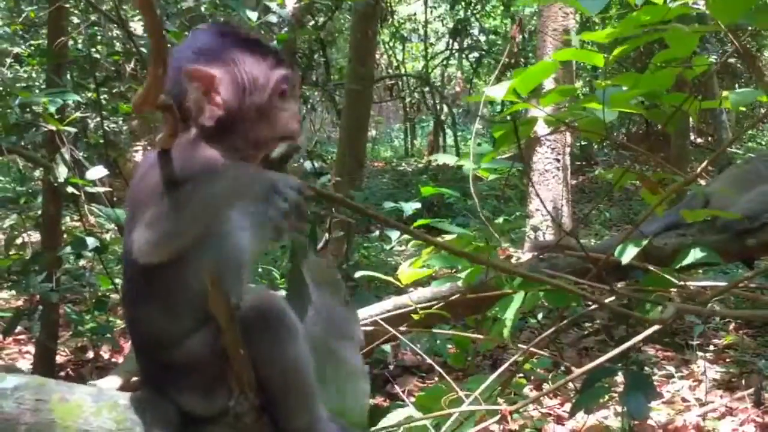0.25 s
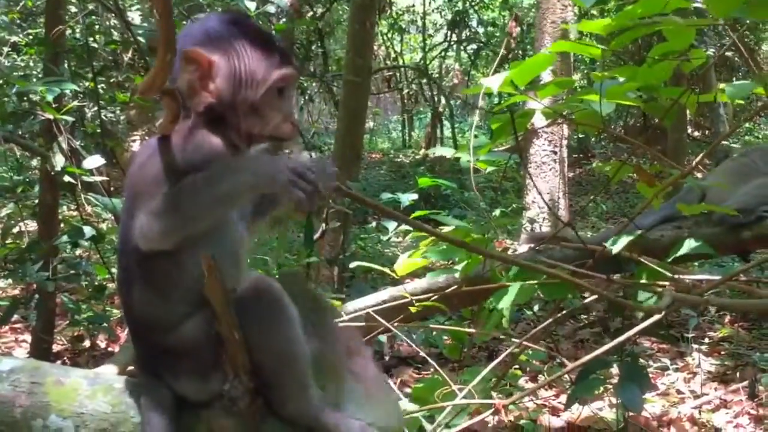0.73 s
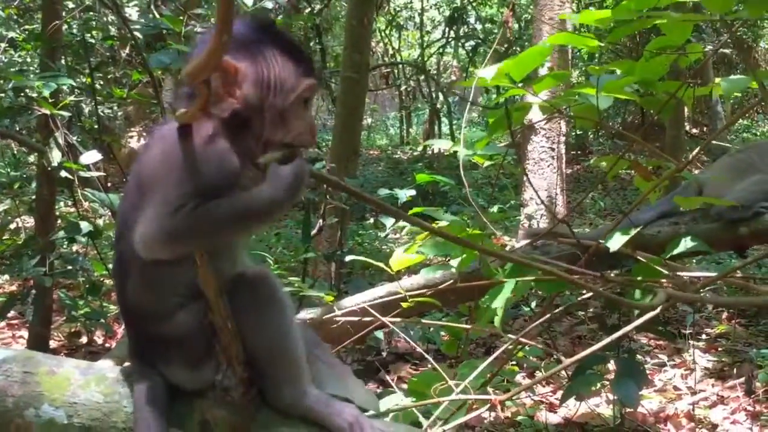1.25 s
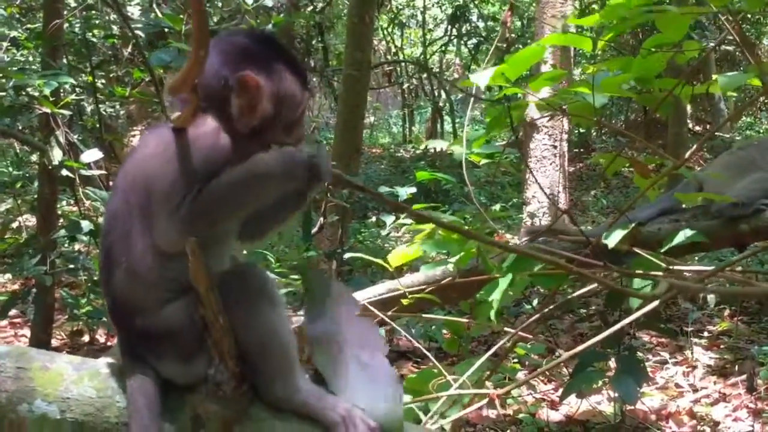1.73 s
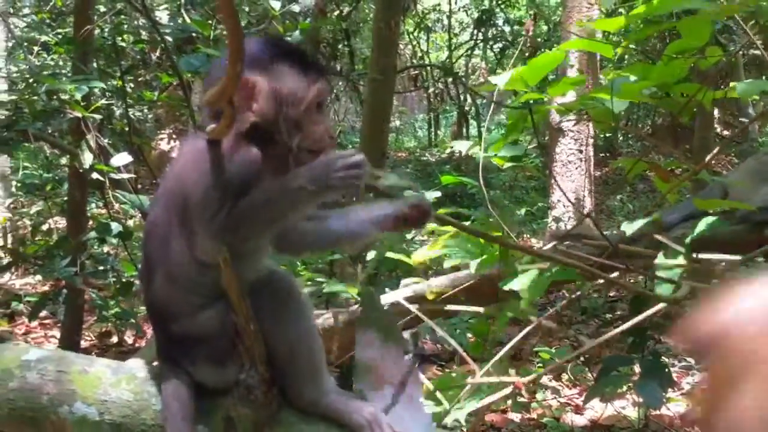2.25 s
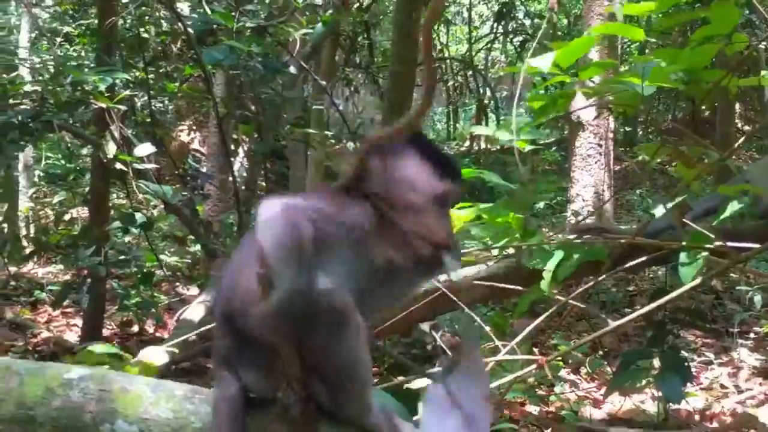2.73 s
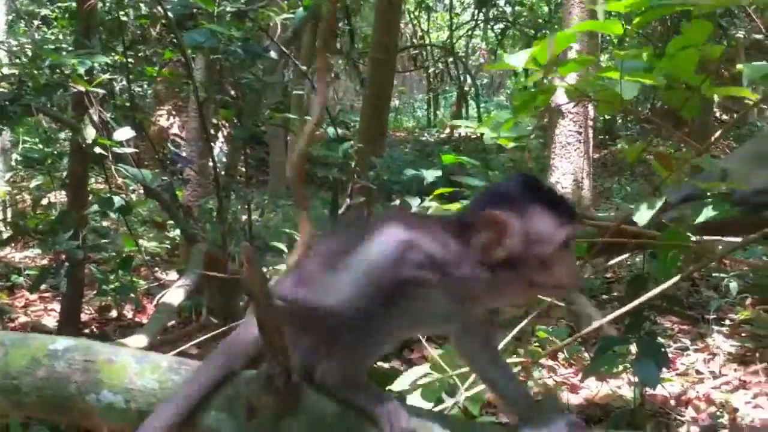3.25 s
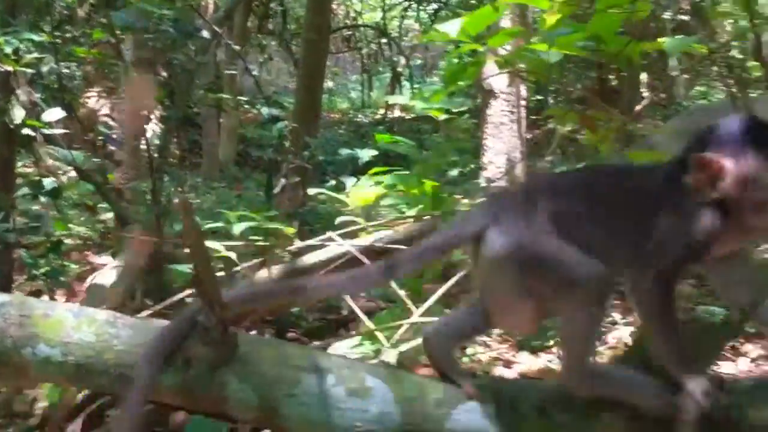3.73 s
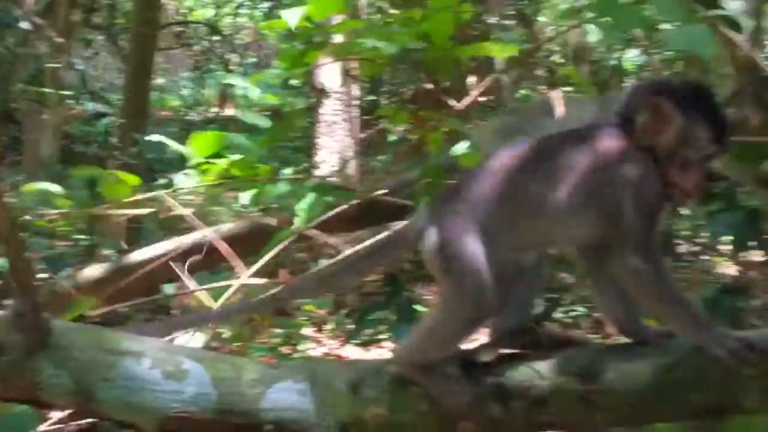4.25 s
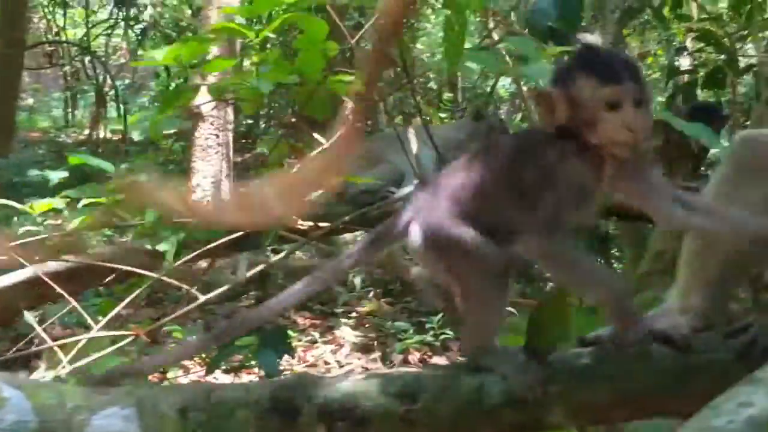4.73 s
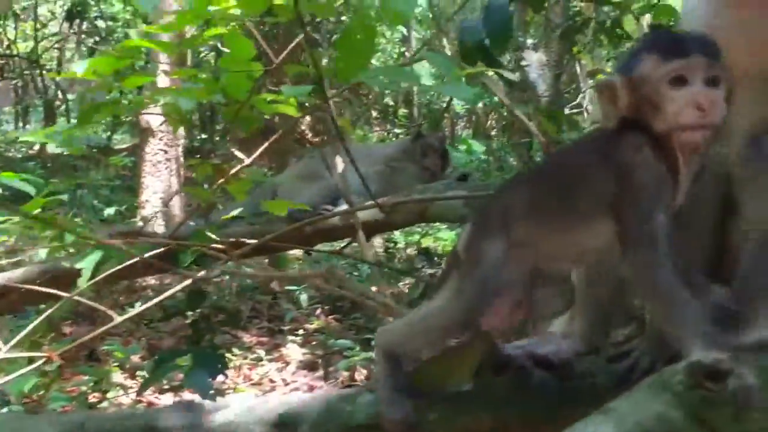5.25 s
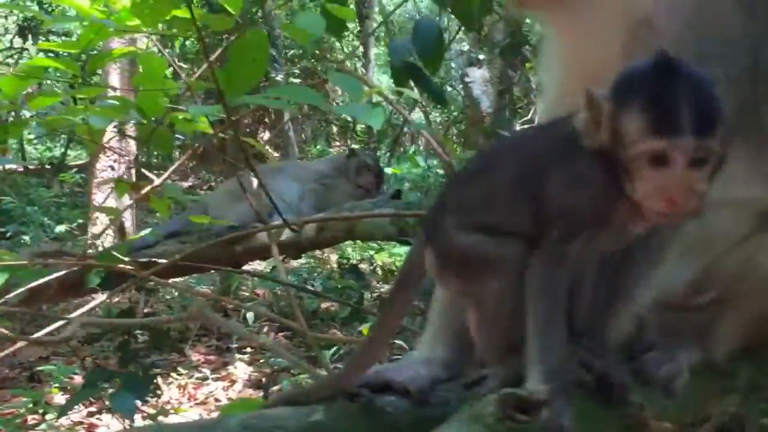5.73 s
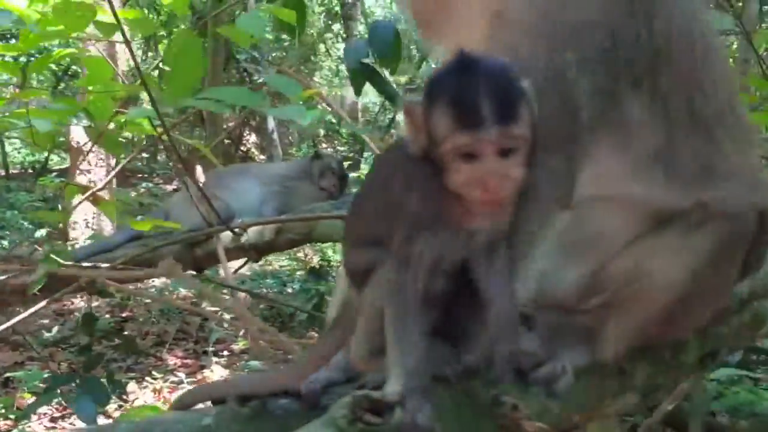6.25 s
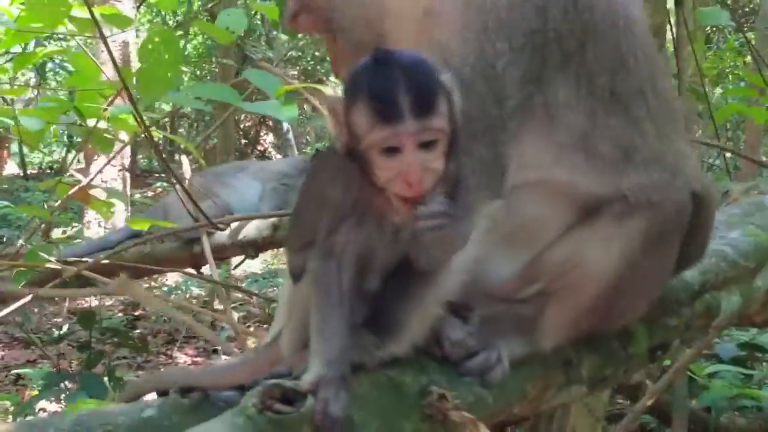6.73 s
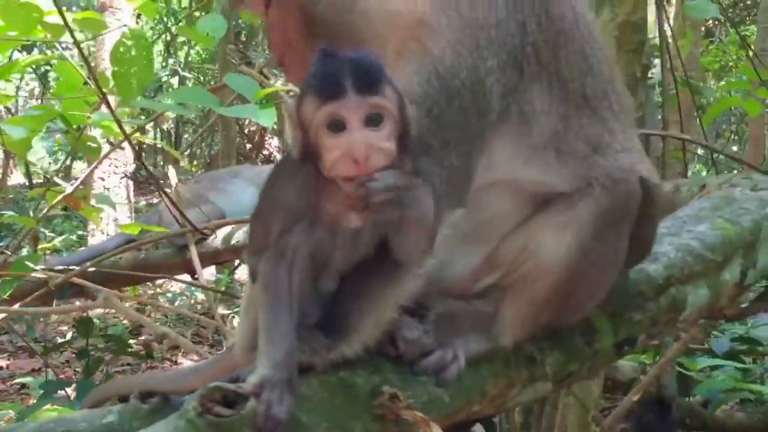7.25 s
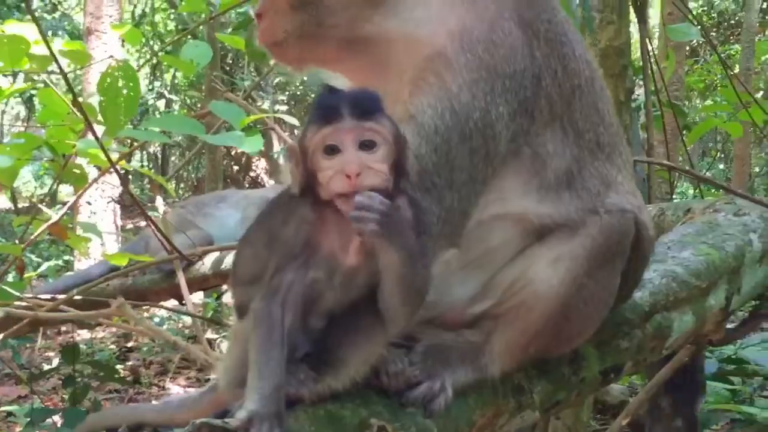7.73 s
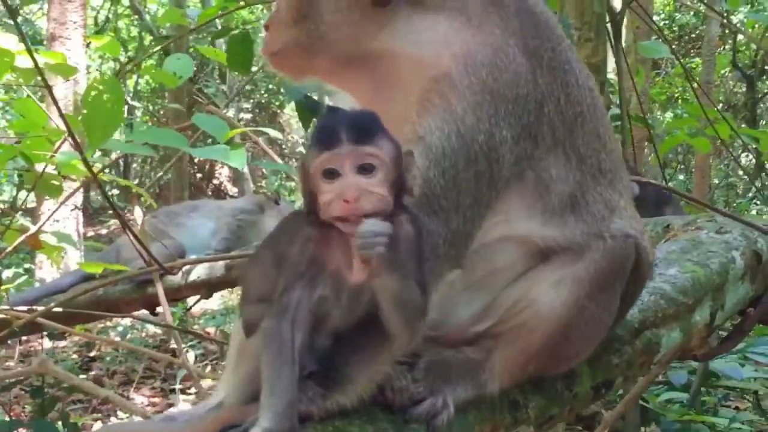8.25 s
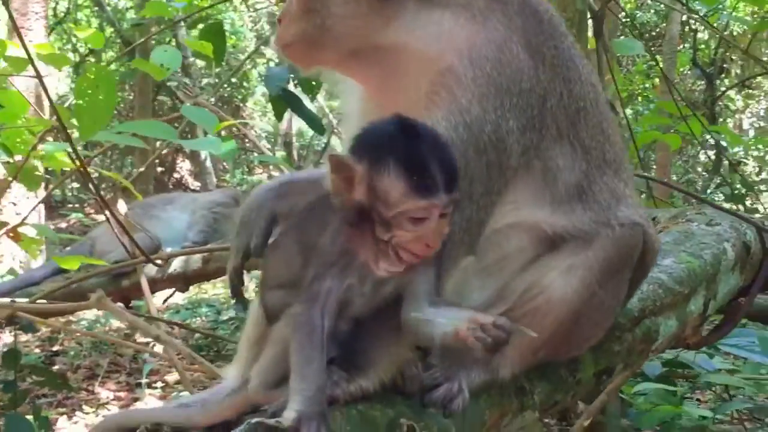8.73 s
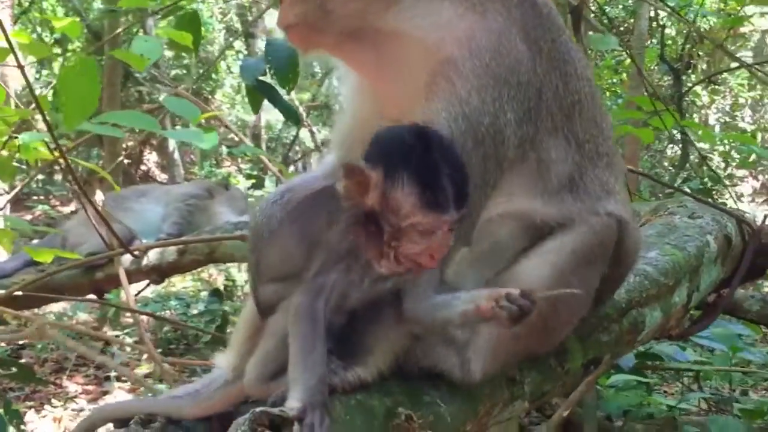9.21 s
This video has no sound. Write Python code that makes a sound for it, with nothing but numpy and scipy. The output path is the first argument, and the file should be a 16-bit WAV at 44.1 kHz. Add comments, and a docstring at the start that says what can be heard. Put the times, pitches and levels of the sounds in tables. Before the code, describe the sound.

Close young monkeys in a forest: one rough chirp, a scuffle with shrill tearing scream and short squeak, dry cracks, then distant birds and insect drone.

```python
"""Macaques in a forest: one barks a harsh chirp made of throbbing noise shaped by sliding resonances.
Another screams, with a whistle that tears into a rasp over a hoarse lower voice, then gives a thin squeak.
They scuffle over dry leaves (showers of tiny clicks); twigs snap and a stick splinters (bursts of noise
that die away), and feet thud on a log (ringing tones). Distant birds whistle and chirp with sliding tones,
an insect drones as narrow bands of noise, and a low rumble and soft forest hush lie under it all."""
import sys
import numpy as np
from scipy import signal
from scipy.fft import rfft, irfft, next_fast_len
from scipy.io import wavfile
from scipy.ndimage import map_coordinates

SR = 44100
rng = np.random.default_rng(int(sys.argv[2]) if len(sys.argv) > 2 else 0)


def wav_record(signal):
    """Record a signal, one row per channel, as 16-bit PCM in the file named by sys.argv[1]."""
    frames = np.transpose(np.atleast_2d(signal))
    bounded = np.clip(frames, -1, 1)
    # unit amplitude maps onto the largest positive 16-bit level
    quanta = np.round(bounded * 32767).astype(np.int16)
    wavfile.write(sys.argv[1], SR, quanta)


N = 418054
TIME = np.arange(N) / SR  # seconds

# All levels in the tables are relative: the functions add their own level settings.
# A t60 is the time a sound takes to fall by 60 dB.

# bursts of the bark: (time [s], hold [s], level [dB], lower resonances against upper [dB])
BARK_BURSTS = [(0.223, 0.0059, -38, -9), (0.2566, 0.021, -15.5, -7.5), (0.307, 0.022, -24.5, 0)]
# throat resonances of the bark, lower and upper group: (frequency [Hz], width [Hz], level [dB])
BARK_LOWER = [(1250, 240, -19.5), (3330, 800, 5), (3870, 260, -9)]
BARK_UPPER = [(5530, 330, -7.5), (6240, 880, -1.5), (9160, 940, -14), (13800, 2550, -21.5)]
# the bark's resonances slide with the mouth: (time [s], frequency ratio [-])
BARK_GLIDE = [(.26, 1.026), (.28, 0.99), (.297, 1.11), (.318, 1.02), (.345, 0.96)]
BARK_ATTACK_S, BARK_RELEASE_T60_S = 0.0088, 0.082

# the scream climbs and sinks: (time [s], whistle pitch [Hz], rasp against whistle [dB])
SCREAM_PATH = [(3.367, 5884, 1.5), (3.395, 8440, -2), (3.44, 11790, 8), (3.475, 14600, 5.5),
               (3.51, 13900, 12), (3.54, 11510, -5.5), (3.565, 10340, -2), (3.6, 11070, 3),
               (3.665, 11980, 1), (3.711, 14460, 6.5), (3.78, 14620, -0.5), (3.881, 15050, -2),
               (3.904, 11700, 5.5), (3.945, 9700, 6.5), (4.05, 8900, 7.5), (4.09, 8230, -3),
               (4.149, 9450, -2), (4.211, 10800, 11.5), (4.3, 9250, 6), (4.333, 8650, -2),
               (4.353, 5010, -2)]
# effort of the scream: (time [s], level [dB])
SCREAM_EFFORT = [(3.367, -26), (3.391, -10), (3.517, -15.5), (3.563, -33.5), (3.695, -18), (3.713, -12.5),
                 (3.745, -19), (3.777, -17), (3.847, -13), (3.857, -11.5), (3.919, -25.5), (4.067, -24),
                 (4.071, -22), (4.273, -19.5), (4.335, -26.5), (4.354, -40)]
# hoarse lower voice, dropping in pitch at the end: (time [s], pitch [Hz], level [dB])
LOWER_VOICE = [(3.367, 3000, -60), (3.42, 3315, -34.5), (3.47, 3750, -37), (3.51, 3830, -59),
               (3.62, 3804, -42.5), (3.8, 3600, -54.5), (4.0, 3480, -47), (4.08, 2780, -41),
               (4.21, 4090, -41), (4.333, 3416, -41), (4.343, 2960, -25), (4.354, 2236, -37.5)]
# overtones of the lower voice: (harmonic number [-], level [dB])
LOWER_VOICE_HARMONICS = [(1, 2), (2, -4), (4, -15.5)]
# colour of the breath noise from the open mouth: (frequency [Hz], level [dB])
MOUTH = [(1500, -35), (2700, -10.5), (3600, -3), (5000, -7), (7000, -1), (10000, 5), (15800, -6.5)]
# the rasp's resonance pulls away above the whistle as the mouth opens, up to a ceiling
RASP_ABOVE_HZ, RASP_CEILING_HZ, MOUTH_OPENS_S = 3700, 14640, .1

# clean squeak: (time [s], pitch [Hz], level [dB])
SQUEAK_PATH = [(4.706, 5840, -28.5), (4.724, 5750, -27.5), (4.751, 5650, -26.5), (4.758, 5930, -33),
               (4.768, 5710, -26), (4.789, 5585, -30), (4.802, 5770, -27.5), (4.819, 5720, -25.5),
               (4.847, 5970, -22), (4.858, 5730, -37)]

# how busy the monkeys are in the leaves: (time [s], level [dB])
SCUFFLE_LEVEL = [(1.8, -85), (1.88, -78), (2.3, -57), (2.55, -49.5), (3.08, -57), (4.1, -42), (4.43, -48.5),
                 (4.78, -43), (5.3, -64.5), (5.85, -64.5), (6.1, -72.5), (8.5, -80)]
# single pushes through the leaves: (middle time [s], length [s], level [dB], crispness [dB])
RUSTLES = [(1.929, 0.075, -52.5, -1.5), (2.05, 0.098, -60.5, 6.5), (2.388, 0.05, -44.5, -3.5),
           (2.776, 0.042, -46, 1.5), (2.861, 0.029, -43.5, -10), (3.183, .045, -46, 1.5),
           (4.022, 0.064, -33, -5), (4.199, 0.1, -37.5, 4), (4.618, 0.087, -41, -2),
           (5.105, 0.062, -48.5, 1), (5.51, 0.077, -56.5, 1.5), (7.74, .12, -61, -9.5),
           (8.09, 0.13, -67, 6), (8.317, .08, -65.5, 3.5)]
# colour of the dull shuffle and of the crisp leaves: (frequency [Hz], level [dB])
SHUFFLE = [(120, -3.5), (300, -7.5), (800, -3), (1600, -3.5), (3500, -3), (6000, -12)]
LEAVES = [(3500, -7), (6000, -3), (9000, -4.5), (11000, -6.5), (15800, -1.5)]

# twigs, leaves and nibbles; thin things break brighter: (time [s], level [dB], brightness [dB])
SNAPS = [(1.647, -51.5, 7), (1.855, -42.5, 2.5), (1.893, -48, -2), (2.215, -51.5, -9), (2.379, -38, 4.5),
         (2.404, -35, -9), (2.523, -33, -7), (2.56, -29.5, 0), (2.928, -42.5, 0), (2.943, -34.5, 2),
         (2.969, -48.5, 13.5), (3.056, -44, 6.5), (3.175, -41, 7), (3.2, -39.5, 2), (3.266, -48, 8),
         (3.309, -40.5, -4.5), (3.537, -41, -5), (3.823, -24.5, -5), (3.837, -28.5, 3),
         (3.969, -25.5, -1.5), (4.033, -26, -4), (4.383, -39, 1), (4.557, -36, -3.5), (4.622, -35.5, 5.5),
         (4.932, -49, -5), (5.456, -48, 4), (5.855, -57, 5), (5.945, -51.5, -1.5), (6.568, -60, 6),
         (6.819, -54, -2.5), (7.816, -52.5, 8), (8.106, -56.5, -11.5), (8.284, -50.5, -9),
         (8.869, -54.5, 1)]
# fibres of a dry stick breaking: (time [s], level [dB])
SPLINTERS = [(4.9709, -22), (4.9775, -21.5), (4.9841, -17.5), (4.9949, -16), (5.0035, -16), (5.007, -14),
             (5.0119, -18), (5.016, -18), (5.033, -19.5)]
SPLINTER_T60_S = .008

# feet landing on the log: (time [s], level [dB])
THUDS = [(2.215, -28), (2.401, -32), (2.625, -16.5), (2.652, -27.5), (2.69, -30.5), (3.825, -28),
         (4.035, -29.5), (4.166, -25), (5.414, -35)]
# tones at which the log rings: (frequency [Hz], level [dB], t60 [s])
LOG_MODES = [(190.6, -19.5, 0.108), (246, -8, 0.11), (289.8, -7.5, 0.081), (353, -9, 0.055),
             (463, -7, 0.042), (671, -11, 0.066), (934, -9, 0.049)]

# distant birds, falling chirps: (start time [s], length [s], middle pitch [Hz], level [dB])
CHIRPS = [(1.402, .16, 2930, -52.5), (5.113, .11, 2900, -46.5), (6.009, 0.11, 3165, -51),
          (6.882, 0.053, 1790, -57.5), (7.651, 0.05, 3510, -52), (7.705, .07, 1550, -60.5),
          (8.991, 0.085, 3080, -50.5)]
# thin, nearly level whistles: (start time [s], middle pitch [Hz], level [dB])
WHISTLES = [(1.51, 2720, -63), (6.02, 2570, -51), (6.04, 3600, -66), (9.02, 2553, -57.5)]
# soft hoots: (start time [s], length [s], level [dB])
HOOTS = [(6.62, 0.15, -64), (7.044, 0.036, -56), (7.171, 0.031, -53.5), (8.548, .13, -58.5)]
# arched whoops: (start time [s], middle pitch [Hz], level [dB])
WHOOPS = [(-0.04, 2044, -45), (7.219, 1825, -46.5), (7.27, 1730, -60.5), (8.684, 1944, -46.5),
          (8.77, 1720, -59)]
# shape of each kind of note, pitches as ratios to the middle:
# (start pitch [ratio], end pitch [ratio], line width at the start [Hz])
CHIRP_SHAPE = (1.1, 0.86, 370)
WHISTLE_SHAPE = (1.02, 0.96, 26)
HOOT_SHAPE = (0.97, 1.01, 25)
WHOOP_SHAPE = (0.96, .89, 34)
WHOOP_S, WHISTLE_S, HOOT_HZ = .085, .17, 976

# narrow bands of the insect's buzz: (frequency [Hz], width [Hz], level [dB])
INSECT = [(7562, 181, 0), (9125, 136, -20)]
# colour of the low rumble: (frequency [Hz], level [dB])
RUMBLE = [(25, -25), (40, -14.5), (53, 4.5), (70, -3), (108, -4), (135, -13), (165, -12.5), (200, -25),
          (250, -27.5)]
# loudness of the rumble: (time [s], level [dB])
RUMBLE_LEVEL = [(0.0, -46.5), (0.47, -51.5), (2.95, -49), (3.09, -54), (6.34, -56.5), (7.76, -50),
                (9.48, -51)]
# colour of the forest hush: (frequency [Hz], level [dB])
AIR = [(200, -6.5), (500, -4), (900, -8), (1800, -12), (3000, -13), (7000, -17.5)]
AIR_DB = -65
# how long echoes last among the trunks: (frequency [Hz], t60 [s])
FOREST_T60 = [(200, 1), (1000, .9), (2500, 0.65), (6500, 0.88), (15000, 0.55)]
CUTOFF_HZ = 15900


def bark(rattle_hz=340, rattle_depth=0.41, lower_db=0, upper_db=-1.0):
    """Chaotic voice: unevenly throbbing noise through the throat's sliding resonances."""
    rattle = np.cos(phase_of(rattle_hz * (1 + 0.242 * drift(200))))
    source = white() * (1 + rattle_depth * rattle)
    # reading the noise faster or slower slides its frequencies; one second is enough
    read_at = [np.cumsum(in_time(BARK_GLIDE)[0])[:SR]]

    def slide(resonances):
        """Resonate the source, then slide the result in frequency."""
        return np.pad(map_coordinates(resonate(source, resonances), read_at), (0, N - SR))

    low, high = slide(BARK_LOWER), slide(BARK_UPPER)
    voice = np.zeros(N)
    for start, hold, db, lower_against_upper in BARK_BURSTS:
        colours = from_db(lower_against_upper + lower_db) * low + from_db(upper_db) * high
        voice += burst(start, hold) * from_db(db) * colours
    return band(voice, 2160, 17000, order=3)


def burst(start, hold):
    """Attack, hold and release of one burst of the bark."""
    age = TIME - start
    attack = np.clip(age / BARK_ATTACK_S, 0, 1)
    release_age = np.maximum(age - BARK_ATTACK_S - hold, 0)
    return attack * from_db(-60 * release_age / BARK_RELEASE_T60_S)


def scream(whistle_db=0, rasp_db=0, lower_db=-1, falter_db=3, hoarseness=.028):
    """Two very high voices at once: a whistle that keeps tearing into a rasp, and a hoarse lower tone."""
    pitch, tearing = in_time(SCREAM_PATH)
    effort, = in_time(SCREAM_EFFORT)
    # whistle and rasp share the power of the effort
    whistle = effort - 10 * np.log10(1 + 10 ** (tearing / 10))
    rasp = whistle + tearing

    # the whistle's pitch shakes ever more as the rasp takes over
    broken = 1 / (1 + from_db(2 * (5 - tearing)))
    shake = .008 * drift(110) + (.008 + .05 * broken) * drift(1500) + .02 * broken * drift(200)
    whistle_level = whistle + whistle_db + falter_db * drift(30) + 2.6 * drift(120)
    tone = from_db(whistle_level) * np.sin(phase_of(pitch * (1 + shake)))

    lower_hz, lower = in_time(LOWER_VOICE)
    lower_shake = hoarseness * from_db(4 * drift(25)) * drift(1200) + .016 * drift(90)
    phase = phase_of(lower_hz * (1 + lower_shake))
    hoarse = np.zeros(N)
    for harmonic, db in LOWER_VOICE_HARMONICS:
        hoarse += from_db(lower + lower_db + db + 4 * drift(60)) * np.sin(round(harmonic) * phase)

    start, end = SCREAM_PATH[0][0], SCREAM_PATH[-1][0]
    opening = 1 - np.exp(-np.maximum(TIME - start, 0) / MOUTH_OPENS_S)
    centre = np.minimum(pitch + RASP_ABOVE_HZ * opening, RASP_CEILING_HZ)
    noisy = from_db(rasp + rasp_db + 1.9 * drift(70)) * shriek(centre)
    return (np.sqrt(2) * (tone + hoarse) + noisy) * gate(start, end, .003)


def shriek(centre_hz, scatter_hz=1350, strand_width_hz=260, mouth_db=-8, tightening_db=5, count=6):
    """Rasp: unstable tones wander about a moving resonance; past 13 kHz the tight mouth mutes the rest."""
    tight = np.maximum(centre_hz - 13000, 0) / 1000  # kHz above 13 kHz
    strands = 0
    for _ in range(count):
        wander = scatter_hz * (drift(22) + .4 * drift(120)) / (1 + .25 * tight)
        hz = centre_hz + wander + strand_width_hz * drift(1800)
        strands = strands + from_db(4 * drift(150)) * np.sin(phase_of(hz))
    breath = from_db(mouth_db - tightening_db * tight) * colour(white(), MOUTH)
    return rms_one(strands) + breath


def squeak(jitter=0.0046, level_db=0, octave_db=-4, hiss_db=-14):
    """A thin, slightly shaky whistle and its octave, with a little hiss."""
    pitch, level = in_time(SQUEAK_PATH)
    phase = phase_of(pitch * (1 + jitter * drift(760)))
    octave = from_db(octave_db + 4.4 * drift(120)) * np.sin(2 * phase)
    tone = from_db(level) * (np.sin(phase) + octave)
    hiss = from_db(level + hiss_db + 4 * drift(90)) * colour(white(), MOUTH)
    mixed = np.sqrt(2) * from_db(level_db) * tone + hiss
    return mixed * gate(SQUEAK_PATH[0][0], SQUEAK_PATH[-1][0], .002)


def scuffle(shuffle_db=0, leaves_db=0, clump_db=2, colour_db=3, tick_db=-6, ticks_per_s=70):
    """Bodies brush through dry leaves: clumps of tiny cracks and some sharp ticks, swelling with each push."""
    shuffle = crackle = from_db(in_time(SCUFFLE_LEVEL)[0])
    for middle, length, db, crisp_db in RUSTLES:
        push = from_db(db) * swell(middle, length)
        # hypot adds the powers
        shuffle = np.hypot(shuffle, push)
        crackle = np.hypot(crackle, from_db(crisp_db) * push)
    clumps = clump_db * drift(32)
    dull_grains = patchy(colour(grains(6000, 3.5), SHUFFLE), colour_db)
    crisp_grains = patchy(colour(grains(5000, 4.0), LEAVES), colour_db)
    low = shuffle * from_db(shuffle_db + clumps) * dull_grains
    high = crackle * from_db(leaves_db + clumps) * crisp_grains
    ticks = crackle * from_db(tick_db) * colour(grains(ticks_per_s, 4.5), LEAVES)
    return low + high + ticks


def swell(middle, length):
    """A smooth rise and fall; length is its width at half power."""
    return 2 ** (-2 * ((TIME - middle) / length) ** 2)


def patchy(x, depth_db):
    """Each leaf has its own colour: every band swells and fades by itself."""
    edges = np.geomspace(100, 17000, 13)
    total = np.zeros(N)
    for k, (low, high) in enumerate(zip(edges, edges[1:])):
        # every second band is flipped in sign
        total += band(x, low, high) * from_db(depth_db * drift(35)) * (-1) ** k
    return rms_one(total)


def snaps(crack_t60=0.025, tail_t60=0.0877, tail_db=-15, woody_db=-3, middle_db=-1, crisp_db=-3, top_db=-4):
    """Each snap is a brief crack and a rustling tail, coloured by the size of what breaks."""
    times, level, bright = np.transpose(SNAPS)
    wood = resonate(white(), [(820, 380, -1.6), (1316, 700, 0.93)])
    middle = patchy(band(white(), 1930, 3700), 1.856)
    top = rms_one(band(white(), 4300, 7200)) + from_db(top_db) * rms_one(band(white(), 7200, 17000))
    out = np.zeros(N)
    for db, noise in [(woody_db - bright, wood), (middle_db, middle), (crisp_db + bright, top)]:
        crack = strikes(times, level + db, crack_t60)
        tail = strikes(times, level + db + tail_db, tail_t60)
        out += noise * (crack + tail)
    return out


def splinters(level_db=-1):
    """A dry stick splinters: a quick run of sharp, bright fibre breaks made of short noise."""
    times, peak = np.transpose(SPLINTERS)
    noise = colour(white(), [(2000, -18), (4000, -2.5), (6500, 2.5), (10000, -2.5), (16000, -9)])
    return noise * strikes(times, peak + level_db, SPLINTER_T60_S)


def thuds(level_db=-8):
    """A soft foot sets the log ringing at its own tones, each dying away at its own rate."""
    times, peak = np.transpose(THUDS)
    out = np.zeros(N)
    for hz, db, t60 in LOG_MODES:
        clicks = np.zeros(N)
        # each landing excites each tone by a different amount
        uneven_db = rng.normal(0, 2.93, len(times))
        clicks[np.round(times * SR).astype(int)] = from_db(peak + db + level_db + uneven_db)
        # a two-step feedback filter rings as a decaying sine
        decay, angle = from_db(-60 / (t60 * SR)), 2 * np.pi * hz / SR
        feedback = [1, -2 * decay * np.cos(angle), decay * decay]
        out += signal.lfilter([0, np.sin(angle)], feedback, clicks + 1e-18)
    return out


def birds(level_db=0, final_roughness=0.46):
    """Chirps, whistles, hoots and whoops: tones of curving pitch that start rough and end purer."""
    notes = [(start, length, hz, db, CHIRP_SHAPE) for start, length, hz, db in CHIRPS]
    notes += [(start, WHISTLE_S, hz, db, WHISTLE_SHAPE) for start, hz, db in WHISTLES]
    notes += [(start, length, HOOT_HZ, db, HOOT_SHAPE) for start, length, db in HOOTS]
    notes += [(start, WHOOP_S, hz, db, WHOOP_SHAPE) for start, hz, db in WHOOPS]
    out = np.zeros(N)
    for start, length, middle_hz, db, (first, last, width) in notes:
        at = np.flatnonzero((TIME >= start) & (TIME < start + length))
        progress = (TIME[at] - start) / length  # 0 to 1 through the note
        curve = np.polyfit([0, .5, 1], [first, 1, last], 2)
        pitch = middle_hz * np.polyval(curve, progress)
        # random pitch jumps widen the tone into a rough line
        roughness = 1 - progress + final_roughness * progress
        jumps = np.sqrt(abs(width) * SR / (2 * np.pi)) * rng.standard_normal(SR)[:len(at)]
        envelope = np.sqrt(np.abs(np.sin(np.pi * progress)))
        note = np.sin(phase_of(pitch + roughness * jumps)) * envelope
        out[at] += from_db(db + level_db) * band(note, middle_hz * .6, middle_hz * 1.8)
    return out


def background(insect_db=-56.5, rumble_db=0, air_db=0, hiss_db=-76):
    """An insect's narrow noise bands over low rumble, the forest hush of dense clicks, and a faint hiss."""
    rumble, = in_time(RUMBLE_LEVEL)
    buzz = from_db(insect_db + 1.0 * drift(40)) * resonate(white(), INSECT)
    low = from_db(rumble + rumble_db) * colour(white(), RUMBLE)
    air = from_db(AIR_DB + air_db) * colour(grains(20000, 2.5), AIR)
    hiss = from_db(hiss_db) * rms_one(band(white(), 10500, 16000))
    return buzz + low + air + hiss


def nearby(x, t60=0.19, count=40):
    """Sparse early echoes off the ground, the log and the closest trunks."""
    delays, signs = rng.random((2, count))
    delays = .003 + .12 * delays ** 2  # seconds, crowded towards the start
    taps = np.zeros(SR)
    taps[(delays * SR).astype(int)] = np.sign(signs - .5) * from_db(-60 * delays / t60)
    return signal.fftconvolve(x, taps / np.sqrt(np.sum(taps ** 2)))[:N]


def forest(x):
    """Countless faint echoes from trunks and leaves: noise whose bands die away at their own rates."""
    t, edges = TIME[:SR], np.geomspace(150, 17000, 9)
    tail = np.zeros(SR)
    for low, high in zip(edges, edges[1:]):
        t60 = at_hz(FOREST_T60, np.sqrt(low * high))
        tail += band(rng.standard_normal(SR), low, high) * from_db(-60 * t / t60)
    tail = tail * (1 - np.exp(-t / 0.0072))  # the echoes build up softly
    tail = signal.sosfilt(signal.butter(2, 14500, fs=SR, output="sos"), tail)
    return signal.fftconvolve(x, tail / np.sqrt(np.sum(tail ** 2)))[:N]


def from_db(db):
    """Turn decibels into a gain."""
    return 10 ** (np.asarray(db) / 20)


def rms_one(x):
    """Scale to an average power of one."""
    return x / np.sqrt(np.mean(x ** 2) + 1e-20)


def in_time(rows):
    """Draw straight lines between the rows: each column's value at every sample."""
    times, *columns = np.transpose(rows)
    return [np.interp(TIME, times, column) for column in columns]


def gate(start, end, edge):
    """Open from start to end, with short ramps outside."""
    return np.clip((TIME - start) / edge + 1, 0, 1) * np.clip((end - TIME) / edge + 1, 0, 1)


def at_hz(points, hz):
    """Read a frequency table on a logarithmic axis, where octaves are equally wide."""
    points = np.array(points)
    return np.interp(np.log(np.maximum(hz, 1)), np.log(points[:, 0]), points[:, 1])


def white():
    """Fresh white noise."""
    return rng.standard_normal(N)


def drift(rate):
    """Random wander about zero, spread near 1: straight lines between 2 * rate random points a second."""
    points = rng.standard_normal(8 * N // 100)
    return 1.2 * np.interp(TIME * rate * 2, np.arange(len(points)), points)


def colour(x, spectrum):
    """Shape by a spectrum that falls away beyond its ends; unit power."""
    size = next_fast_len(N)
    hz = np.maximum(np.arange(size // 2 + 1) * SR / size, 1)
    skirts = np.minimum(1, hz / spectrum[0][0]) ** 3 * np.minimum(1, spectrum[-1][0] / hz) ** 3
    shaped = rfft(x, size) * from_db(at_hz(spectrum, hz)) * skirts
    return rms_one(irfft(shaped, size)[:N])


def band(x, low_hz, high_hz, order=2):
    """Keep only the frequencies between two limits."""
    limits = [low_hz, min(high_hz, SR * .45)]
    return signal.sosfilt(signal.butter(order, limits, "band", fs=SR, output="sos"), x + 1e-18)


def resonate(x, resonances):
    """Steep-sided resonances side by side; unit power."""
    total = 0
    for hz, width, db in resonances:
        total = total + from_db(db) * rms_one(band(x, hz - width / 2, hz + width / 2))
    return rms_one(total)


def phase_of(hz):
    """Running phase of a moving frequency."""
    return 2 * np.pi * np.cumsum(hz) / SR


def grains(per_s, spread_db):
    """Random clicks of very unequal size."""
    hits = rng.random(N) < per_s / SR
    sizes = from_db(spread_db * np.minimum(rng.exponential(1, N), 4))
    return hits * sizes * np.sign(white())


def strikes(times, levels_db, t60):
    """Envelope that jumps at each time and dies away."""
    clicks = np.zeros(N)
    clicks[np.round(np.asarray(times) * SR).astype(int)] = from_db(levels_db)
    return signal.lfilter([1], [1, -from_db(-60 / (t60 * SR))], clicks + 1e-18)


def scene(early_db=-18, bark_echo_db=-27, near_echo_db=-30, bird_echo_db=-5, bird_direct_db=-2):
    """The monkeys are close and nearly dry; the birds are far off, with strong echo."""
    chirp, cries, far = bark(), scream() + squeak(), birds()
    movement = scuffle() + snaps() + splinters() + thuds()
    early = from_db(early_db) * nearby(chirp + cries)
    near_echo = from_db(bark_echo_db) * chirp + from_db(near_echo_db) * (cries + movement)
    late = forest(near_echo + from_db(bird_echo_db) * far)
    direct = chirp + cries + movement + from_db(bird_direct_db) * far
    return (direct + early + late + background())[None]


def record(dry):
    """Loud peaks are rounded and the top is cut steeply."""
    rounded = 1.2 * np.tanh(dry / 1.2)
    return signal.sosfilt(signal.ellip(12, .1, 80, CUTOFF_HZ, fs=SR, output="sos"), rounded)


dry = scene()
out = record(dry)
wav_record(out)
```